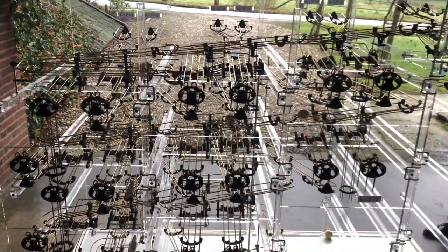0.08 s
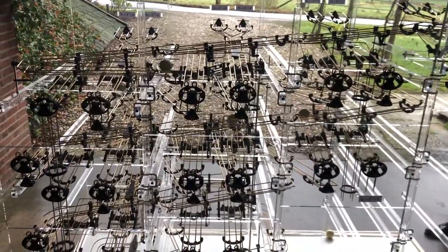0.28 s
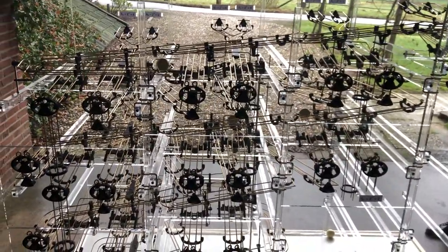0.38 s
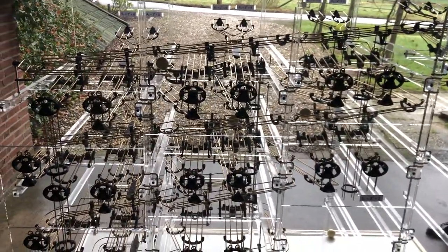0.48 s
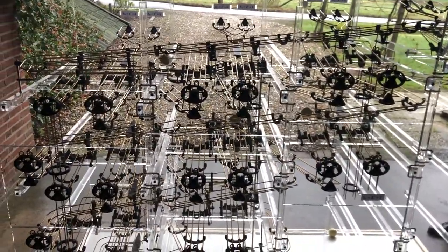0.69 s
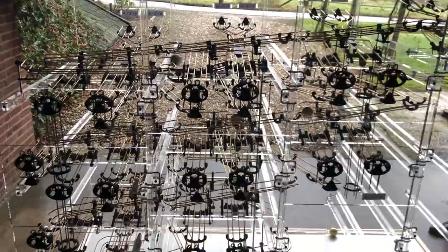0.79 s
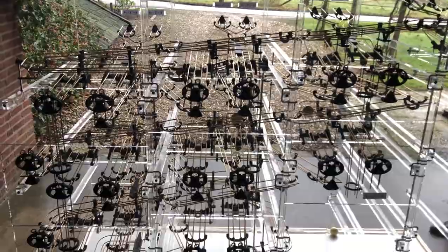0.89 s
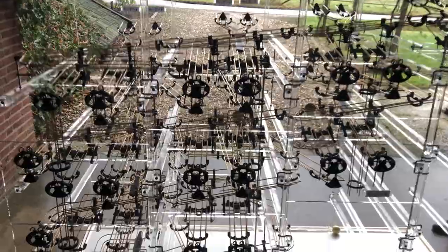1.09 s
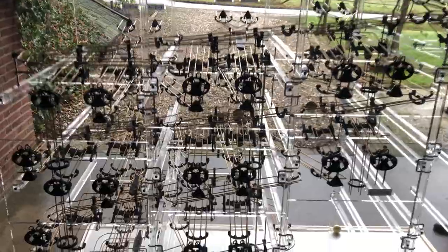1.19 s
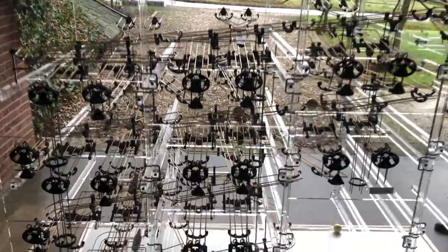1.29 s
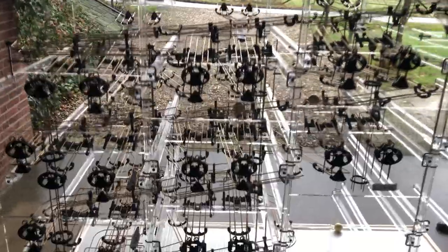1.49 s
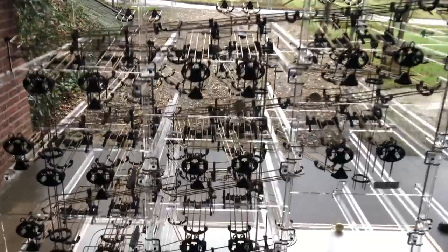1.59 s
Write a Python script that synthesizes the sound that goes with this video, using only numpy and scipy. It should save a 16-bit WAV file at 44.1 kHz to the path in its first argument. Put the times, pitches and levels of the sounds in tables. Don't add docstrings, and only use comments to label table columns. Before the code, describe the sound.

A rolling-ball machine of metal rails, close camera microphone: two heavy knocks almost together, a pause of low rolling, another sharp slam and duller clack, then light ball ticks, ending on a small lever click.

```python
import sys
import numpy as np
from scipy import signal
from scipy.fft import rfft, irfft, next_fast_len
from scipy.io import wavfile
from scipy.ndimage import uniform_filter1d

SR = 44100
rng = np.random.default_rng(int(sys.argv[2]) if len(sys.argv) > 2 else 0)


def boost(x):
    u = np.asarray(x, float) / 20
    return 10 ** u


def waveform_to_disk(signal):
    frames = np.transpose(np.atleast_2d(signal))
    scaled = np.clip(frames, -1, 1) * 32767
    samples = np.round(scaled).astype(np.int16)
    wavfile.write(sys.argv[1], SR, samples)


N = 70560
LEAD = 441


# t/s, level/dB, tilt/(dB per octave), frame level/dB, deck level/dB
SLAMS = [(0.059, -40.5, 1.5, 0.5, -16), (0.111, -39.5, -5.5, -14, -12.5), (0.191, -36.5, -1.5, -5, -13),
         (0.2202, -15, 0, 0.5, -23), (.263, -16.5, 0, -0.5, -6.5), (0.5677, -16, -1, -3, -9),
         (0.594, -28, -0.5, 9.5, -10), (.688, -25, -2, 2.5, -10), (1.25, -42.5, 1, -3, -3.5),
         (1.55, -34.5, 2.5, -14, 2.5), (1.576, -45, -8.5, -4, -2)]
# f/Hz, density/(dB per Hz)
SLAM_COLOUR = [(30, -51), (70, -22), (170, -9), (400, -13), (800, -8), (1850, -14), (5050, -23),
               (16000, -50)]
# f/Hz, level/dB, t60/s
FRAME = [(142.8, -1, 0.96), (161, -0.5, 1), (189, -10, 0.48), (257.7, -2, 0.97), (312.1, -2, 0.86),
         (466.5, -1.5, 0.2), (569.4, 5, 0.19), (658.4, 5, 0.17), (732, -17, 0.13), (819, -22, 0.3),
         (1053, 1.5, 0.35), (1158, -14.5, 0.56), (1288, 2.5, 0.3), (1459, -1.5, 0.31)]
# f/Hz, level/dB, t60/s
DECK = [(200.5, -1, 1.3), (279, -1, 1.94)]


def slams():
    s, db, tilt_db, frame_db, deck_db = np.transpose(SLAMS)
    count = len(s)
    blow = answer(count, burst_t60=0.039, burst_db=2.0, swell_s=0.0029, shorter=1.11)
    blow = coloured(blow, SLAM_COLOUR, tilt_db, pivot_hz=1440)
    frame = ringing(count, FRAME, scatter_db=2.0, detune=0.0189, attack_s=0.0007)
    deck = ringing(count, DECK, scatter_db=3.8, detune=0.0047, attack_s=0.0017)
    boom = frame * boost(frame_db - 11.0)[:, None] + deck * boost(deck_db - 8.5)[:, None]
    return placed(filtered(blow + lead_in(boom), lag), s, db)


# t/s, level/dB, thump/dB, distance along the rail (0-1.5)
KNOCKS = [
    (0.2208, -20, -4, 0.34),
    (.232, -36, 8, 0.55),
    (0.2664, -21, 2, 0.39),
    (0.5671, -15, -10, 1.0),
    (.596, -28, -24, 0.8),
    (.687, -24.5, -4, 1.4),
    (.701, -31, -11.5, 0.08),
]
# f/Hz, level/dB, t60/s
THUMP = [(161, 5, 0.077), (954, 0, 0.068), (1240, -18, 0.02)]


def knocks():
    s, db, thump_db, distance = np.transpose(KNOCKS)
    t = np.arange(SR) / SR
    blow = boost(3.5 - 60 * t / 0.05) * rng.standard_normal((len(s), SR))
    blow = blow + boost(21) * (t == 0)
    blow = coloured(blow, SLAM_COLOUR, 0 * s - 0.6, pivot_hz=1100)
    blow = filtered(blow, lambda hz: lag(hz, distance[:, None]))
    thump = ringing(len(s), THUMP, scatter_db=0.0, detune=0.094, attack_s=0.005) * boost(thump_db)[:, None]
    return placed(blow + lead_in(thump), s, db)


# t/s, level/dB, tilt/(dB per octave), snap over its echo/dB
CLACKS = [(.003, -44.5, 15, 1), (.06, -45.5, -12.5, 0), (0.2206, -28.5, 4.5, 17.5), (0.5667, -30, -6.5, 16),
          (0.684, -26, -2.5, -8), (0.881, -39, 9, 4), (.915, -59, 10, 20.5), (1.001, -42, 5, 5),
          (1.139, -48.5, 14, 3), (1.2465, -45.5, 0.5, 9), (1.267, -48, 11.5, -1), (1.303, -51.5, -11, 8.5),
          (1.443, -50, -0.5, 11.5), (1.46, -62, -14, -8), (1.482, -56, -3, 13), (1.51, -62, -15, -5),
          (1.553, -37.5, 11, 5.5)]
# f/Hz, density/(dB per Hz)
CLACK_COLOUR = [(350, -36), (900, -22), (1900, -22), (2500, -7), (3700, -1), (5000, -9), (7000, -22),
                (14000, -33)]
# f/Hz, width/Hz, level/dB
LEVER = [(2490, 410, 5.5), (2890, 205, 8), (3650, 300, 1), (4740, 120, -1.5), (5130, 610, 0.5)]


def clacks():
    s, db, tilt_db, snap_db = np.transpose(CLACKS)
    noise = answer(len(s), burst_t60=0.049, burst_db=snap_db[:, None], swell_s=0.011, shorter=0.6)
    snap = resonant(noise, LEVER, scatter_db=-3.0, detune=0.028)
    snap = coloured(snap, CLACK_COLOUR, tilt_db, pivot_hz=3870)
    return placed(filtered(snap, lag), s, db - 6)


# t/s, level/dB, rattle t60/s
TICKS = [(0.015, -48.5, 0.26), (0.067, -50, 0.75), (0.114, -39.5, 0.33), (0.145, -53, 0.49),
         (0.218, -54, .1), (0.44, -55, .2), (0.566, -61, 0.079), (0.609, -46, 0.22), (0.661, -43, 0.11),
         (0.707, -32.5, 0.14), (0.739, -43, 0.25), (0.798, -45, 0.18), (0.878, -41, 0.26),
         (0.916, -49, 0.24), (0.954, -45, 0.17), (.978, -47, 0.26), (1, -45.5, 0.47), (1.034, -47.5, 0.29),
         (1.098, -44.5, 0.25), (1.137, -51, 0.28), (1.196, -49, 0.16), (1.301, -47.5, 0.16),
         (1.379, -53.5, 0.08), (1.481, -62, 0.2), (1.573, -39, 0.27)]
# f/Hz, density/(dB per Hz)
TICK_COLOUR = [(2000, 8), (5000, 4.5), (9000, 3), (13000, -3), (16000, -1)]
# f/Hz, width/Hz, level/dB
BALL = [(6700, 700, -4), (7330, 110, -6), (8300, 430, -1.5), (9800, 760, 2), (11540, 580, 3),
        (12900, 300, -4), (13000, 210, 7), (14100, 260, -11), (15000, 220, -7)]


def ticks():
    s, db, t60 = np.transpose(TICKS)
    grains = rng.standard_normal((len(s), SR // 50))
    grit = boost(0.94 * np.repeat(grains, 50, axis=1))
    noise = answer(len(s), burst_t60=t60[:, None], burst_db=9.5, swell_s=0.017, shorter=1.0) * grit
    tick = resonant(noise, BALL, scatter_db=2.5, detune=0.018)
    return placed(coloured(tick, TICK_COLOUR, 0 * s, pivot_hz=9000), s, db - 9.5)


# t/s, f/Hz, level/dB, t60/s
PINGS = [(.1126, 13000, -41, .05), (.2215, 3470, -14, .06), (0.221, 5500, -28, .05),
         (.574, 262.2, -18, 0.38), (.228, 161, -13, 0.32), (.27, 258, -22, 0.64), (0.575, 168, -13, 0.21),
         (.571, 990, -19, .06), (.62, 200.5, -24.5, 0.35), (.692, 950, -21, 0.031), (.7, 168, -24.5, 0.18),
         (.7, 199, -25, 0.82), (.78, 279, -32, 1.1), (1.005, 5470, -41, .08), (1.008, 7800, -43, .08),
         (1.574, 11100, -38, .1), (.5625, 6060, -43, .02), (.567, 4630, -34, .04), (.568, 3600, -31, 0.039),
         (.6863, 3700, -32, 0.027), (.7083, 6200, -25, 0.032), (.711, 8050, -52, 0.073),
         (.881, 12900, -37, .025), (.886, 6500, -37, 0.051), (.9, 8200, -40.5, .1),
         (.9512, 15000, -48, .12), (.9515, 9800, -48.5, .04), (1.034, 9800, -40, .035),
         (1.035, 8300, -48, .12), (1.038, 12300, -48, .06), (1.097, 9820, -37, 0.027),
         (1.098, 12900, -44, .1), (1.099, 15140, -48, .06), (1.108, 7300, -44, 0.068),
         (1.247, 3720, -35.5, 0.059), (1.256, 3470, -38, .04), (1.2655, 3650, -38, .05),
         (1.25, 762, -40, 0.18), (1.276, 705, -43, .03), (1.303, 12800, -58, .1), (1.38, 12600, -56, 0.07),
         (1.4436, 3830, -35, .04), (1.453, 2660, -45, 0.092), (1.4825, 3030, -48, 0.069),
         (1.493, 2580, -43.5, 0.088), (1.508, 3130, -41, 0.031), (1.554, 3640, -30, 0.06),
         (1.55, 932.4, -34, 0.11), (1.574, 13000, -43, 0.088), (1.575, 14800, -39, .1)]


def pings():
    s, hz, db, t60 = np.transpose(PINGS)[:, :, None]
    t = np.arange(SR // 3) / SR
    wander = np.cumsum(rng.standard_normal((len(s), len(t))), axis=1)
    chatter = 1.7 * wander * (hz / 4000) ** 0.77 / 20
    envelope = boost(-60 * t / t60) * (1 - np.exp(-t / 0.0015)) * (1 - (3 * t) ** 2)
    ring = np.sin(2 * np.pi * hz * t + chatter) * envelope
    return placed(lead_in(ring), s[:, 0], db[:, 0])


# t/s, level/dB
ROLL = [(0.0, -40), (0.15, -41.5), (0.458, -38.5), (0.578, -49), (0.762, -58), (0.882, -38.5), (1.078, -42),
        (1.6, -46.5)]
# f/Hz, density/(dB per Hz)
ROLL_COLOUR = [(12, -50), (40, -6.5), (204, -0.5), (434, -7), (1710, -13.5), (3340, -13.5), (9950, -38),
               (16000, -46)]


def rolling():
    z = signal.stft(rng.standard_normal(N), nperseg=512)[2]
    field = uniform_filter1d(rng.standard_normal(z.shape), 6, axis=0)
    field = uniform_filter1d(field, 8, axis=1)
    noise = signal.istft(z * boost(1.8 * unit(field)), nperseg=512)[1][:N]
    rumble = unit(filtered(noise, lambda hz: boost(along(ROLL_COLOUR, hz))))
    s, db = np.transpose(ROLL)
    return rumble * boost(np.interp(np.arange(N) / SR, s, db) - 1.5)


# f/Hz, density/(dB per Hz)
AIR_COLOUR = [(20, -17), (50, 11), (90, 16), (200, -7), (320, -15), (600, -29)]


def air():
    noise = rng.standard_normal(N)
    return boost(-53) * unit(filtered(noise, lambda hz: boost(along(AIR_COLOUR, hz))))


# f/Hz, t60/s
WALLS = [(150, 0.95), (500, 0.5), (1500, 0.55), (4000, 0.49), (8000, 0.4), (14000, 0.27)]


def answer(count, burst_t60, burst_db, swell_s, shorter):
    hz, t, z = signal.stft(rng.standard_normal((count, SR)), SR, nperseg=256)
    wall_t60 = shorter * along(WALLS, hz)[:, None]
    tail = signal.istft(z * boost(-60 * t / wall_t60), SR, nperseg=256)[1][:, :SR]
    t = np.arange(SR) / SR
    burst = boost(burst_db - 60 * t / burst_t60) * (1 - np.exp(-t / 0.00052))
    return tail * (1 - np.exp(-t / swell_s)) + burst * rng.standard_normal((count, SR))


def ringing(count, modes, scatter_db, detune, attack_s):
    hz, db, t60 = np.repeat(modes, 2, axis=0).T[:, None, :, None]
    t = np.arange(SR // 2) / SR
    shift, phase, strength = rng.standard_normal((3, count, 2 * len(modes), 1))
    neighbour = (np.arange(2 * len(modes)) % 2)[:, None]
    waves = np.sin(2 * np.pi * (hz * (1 + detune * shift * neighbour) * t + phase))
    decay = boost(db - 5.9 * neighbour + scatter_db * strength - 60 * t / t60)
    ring = (decay * waves).sum(axis=1) * (1 - np.exp(-t / attack_s))
    return np.pad(ring * (1 - 2 * t), ((0, 0), (0, SR - SR // 2)))


def resonant(x, peaks, scatter_db, detune):
    fc_hz, width, db = np.transpose(peaks)[:, None, :, None]
    shift, strength = rng.standard_normal((2, len(x), len(peaks), 1))
    fc_hz = fc_hz * (1 + detune * shift)
    gain = boost(db + scatter_db * strength)

    def response(hz):
        damping = 1j * hz * width
        return 1 + (gain * damping / (fc_hz ** 2 - hz * hz + damping)).sum(axis=1)
    return filtered(x, response)


def lag(hz, distance=0.7):
    spread_s, spread_hz = 0.45, 398
    bent = np.minimum(hz, 6810)
    cycles = 2 * spread_s * np.sqrt(bent + spread_hz)
    on_time = bent * spread_s / np.sqrt(3500 + spread_hz)
    return np.exp(-2j * np.pi * distance * (cycles - on_time))


def coloured(x, colour, tilt_db, pivot_hz):
    def response(hz):
        gain = boost(along(colour, hz))
        tilt = boost(np.outer(tilt_db, np.log2((hz + 110) / pivot_hz)))
        return gain / np.sqrt(np.mean(gain ** 2)) * tilt
    return filtered(lead_in(x), response)


def lead_in(x):
    return np.pad(x, ((0, 0), (LEAD, 0)))


def placed(sounds, times, dbs):
    out = np.zeros(N + 2 * SR)
    for sound, s, db in zip(sounds, times, dbs):
        out[round(s * SR) + LEAD:][:len(sound)] += boost(db) * sound
    return out[2 * LEAD:][:N]


def unit(x):
    return x / np.sqrt(np.mean(x ** 2) + 1e-20)


def along(points, hz):
    f, v = np.transpose(points)
    return np.interp(np.log(hz + 1), np.log(f + 1), v)


def filtered(x, response):
    m = next_fast_len(x.shape[-1] + 4096)
    return irfft(rfft(x, m) * response(np.fft.rfftfreq(m, 1 / SR)), m)[..., :x.shape[-1]]


def scene():
    machine = slams() + clacks() + ticks() + rolling() + air() + knocks() + pings()
    return np.tile(machine, (2, 1))


# f/Hz, share (0-1)
UNRELATED = [(3800, 0), (4500, .08), (9000, 0.22), (11500, 0.2), (14000, 0.41), (16000, 0.23)]


def loose_treble(mid):
    hz, t, z = signal.stft(mid, SR, nperseg=1024)
    band = (hz * 40 / (hz[-1] + 1)).astype(int)
    patch = rng.random((40, len(t) // 4 + 1))[band][:, np.arange(len(t)) // 4]
    level = np.linalg.norm(z, axis=0)
    weight = (hz[:, None] > 10500) | (level < boost(-35))
    weight = np.where(level > 3.5 * np.roll(level, 1), 4, weight)
    chosen = patch < along(UNRELATED, hz)[:, None] * weight
    loose = boost(-1) * np.abs(z) * np.exp(2j * np.pi * rng.random(z.shape)) * chosen
    return signal.istft(loose, SR, nperseg=1024)[1][:N]


def band_limit(x):
    return signal.sosfilt(signal.butter(12, 16480, fs=SR, output="sos"), x)


def record(dry):
    ceiling = 0.59
    soft = dry[0] / (1 + np.abs(dry[0] / ceiling) ** 4) ** (1 / 4)
    mid = filtered(soft, lambda hz: (hz < 15900) / np.sqrt(1 + (55 / (hz + 1)) ** 6))
    side = loose_treble(mid)
    return band_limit(np.array([mid + side, mid - side]))


dry = scene()
out = record(dry)
waveform_to_disk(out)
```